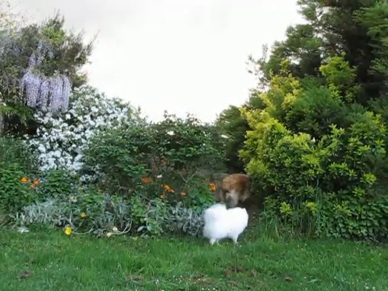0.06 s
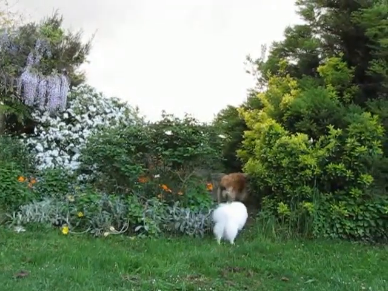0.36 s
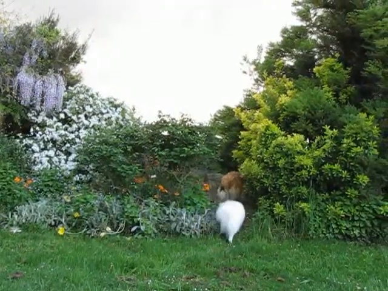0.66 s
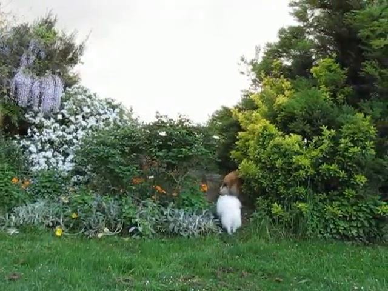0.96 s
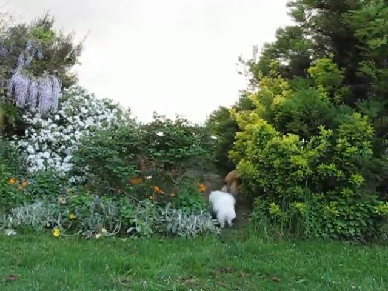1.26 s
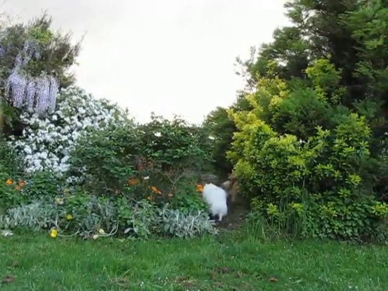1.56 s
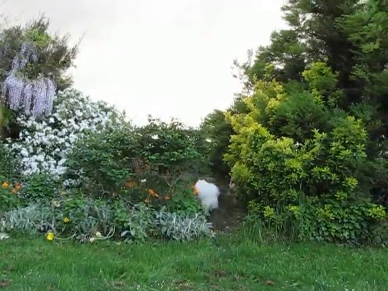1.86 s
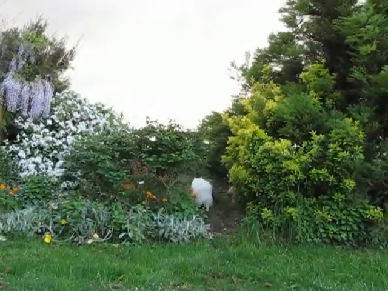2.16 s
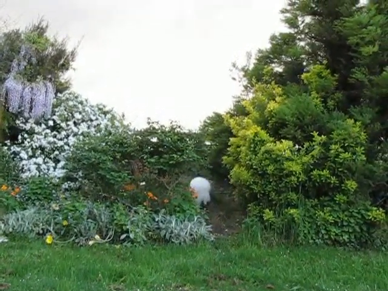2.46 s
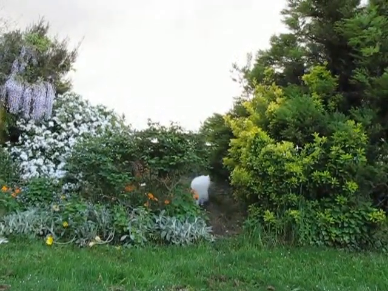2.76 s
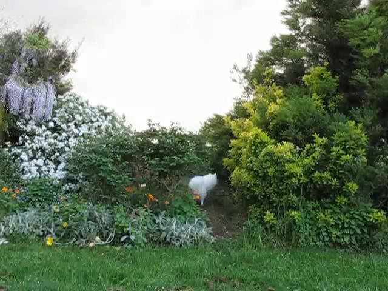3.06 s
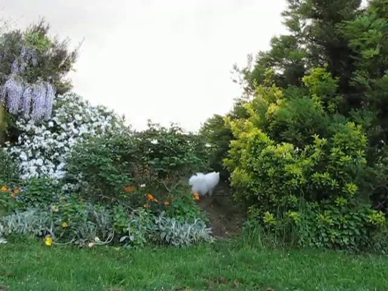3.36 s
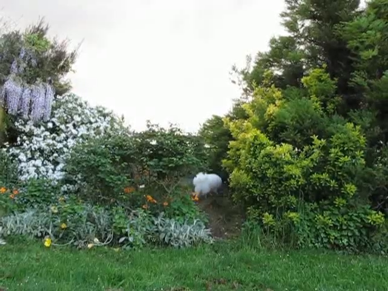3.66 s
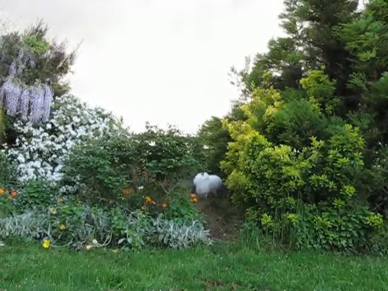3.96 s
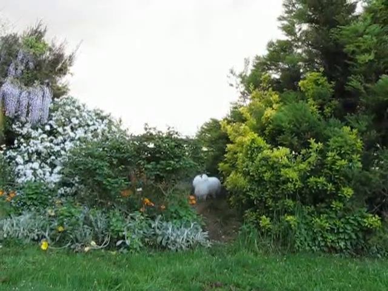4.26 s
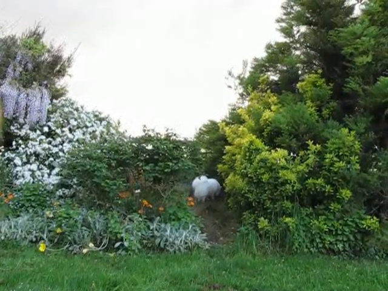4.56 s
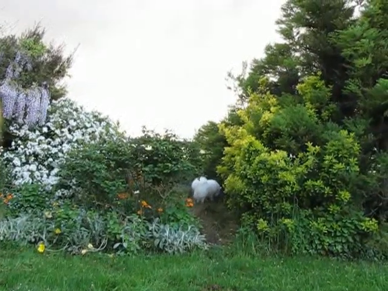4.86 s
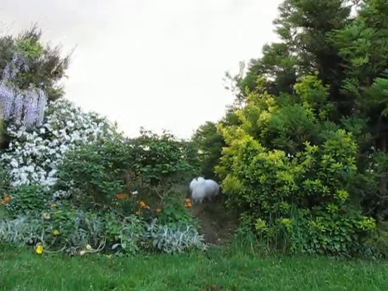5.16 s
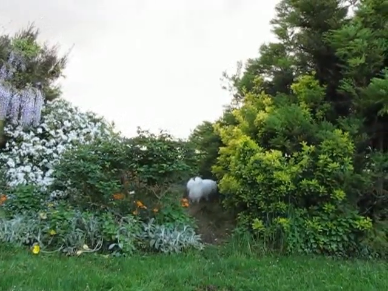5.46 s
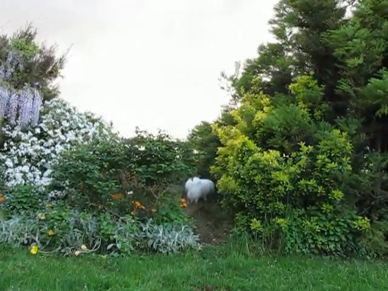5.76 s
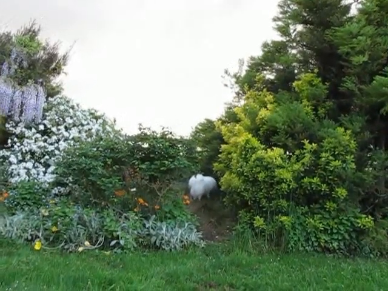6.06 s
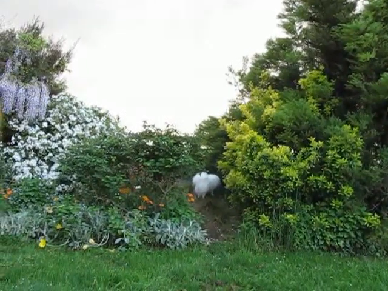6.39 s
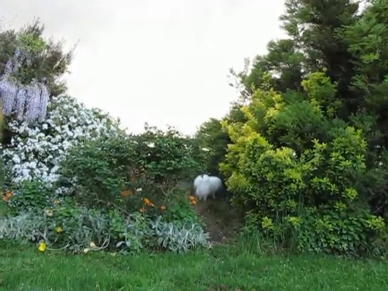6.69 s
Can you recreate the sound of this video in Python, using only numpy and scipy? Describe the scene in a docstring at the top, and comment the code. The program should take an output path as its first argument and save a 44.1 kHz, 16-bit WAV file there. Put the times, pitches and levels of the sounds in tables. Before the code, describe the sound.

A songbird whistles and trills in a garden over sparrow chirps, while gusts of wind rumble on the microphone.

```python
"""A hedged garden on a breezy day. Gusts buffet the two microphone ports, hardest at first, as a songbird
opens with whistles and slurs, then strings on trills, rising pairs and double chits. Past the middle the
wind eases, leaving sparrows farther off and soft chatter from the hedge. Near the end the songbird returns
with a run of hooks. Throughout, the shrubs scatter every note, and under it all lie distant traffic,
a motor's hum and a faint rustle of leaves."""
import sys
import numpy as np
from scipy import signal
from scipy.io import wavfile
from scipy.ndimage import uniform_filter1d

SR = 44100
rng = np.random.default_rng(int(sys.argv[2]) if len(sys.argv) > 2 else 0)


def put_to_file(sound):
    """Save the sound as 16-bit audio at rate SR, in the file named by the first command-line argument."""
    columns = np.atleast_2d(sound).T  # one column per channel
    safe = np.clip(columns, -1, 1)
    whole_steps = np.round(safe * 32767)
    wavfile.write(sys.argv[1], SR, whole_steps.astype(np.int16))


N = 301203

# Long whistles. Each row: start and length in seconds, held pitch, end pitch and closing lift in Hz,
# level in dB.
WHISTLE_NOTES = [(0.053, 0.185, 2901, 3036, -13, -34), (0.681, 0.17, 2827, 2835, 118, -31.5)]
# Falling slurs. Each row: start and length in seconds, onset and goal pitch in Hz, settling time in
# seconds, then level, scatter send and mid-note arch in dB.
SLUR_NOTES = [(0.289, 0.14, 4460, 3556, 0.037, -44.5, 3, 17.5),
              (0.891, 0.18, 4755, 3516, 0.051, -44.5, 1, 18),
              (1.754, 0.115, 3400, 1000, 0.066, -47.5, 1, 7),
              (2.53, 0.059, 3920, 2003, 0.032, -36, 2.5, 18.5),
              (2.704, 0.11, 4220, 2524, .028, -33.5, 0, 19.5), (6.282, 0.1, 2265, 2020, 0.034, -48, -3, 13),
              (6.328, 0.033, 2060, 1770, 0.013, -43, -2, 3)]
# Trills. Each row: start and length in seconds, centre pitch and swing either way in Hz, turns per second,
# level in dB.
TRILL_NOTES = [(1.29, 0.112, 3177, 780, 39, -43.5), (3.457, 0.11, 3076, 632, 39.5, -41.5)]
# Pairs of rising notes, the second lower and louder. Each row: start and first note's length in seconds,
# first and second pitch in Hz, level in dB.
PAIR_NOTES = [(1.514, 0.073, 3335, 2635, -40.5), (3.717, 0.072, 3230, 2599, -38)]
# Double chits. Each row: start and delay of the second chit in seconds, level in dB.
CHIT_NOTES = [(2.017, 0.045, -35.5), (2.148, 0.042, -34), (2.878, 0.05, -33.5), (3.017, 0.039, -33.5)]
# Hooked notes. Each row: start and length in seconds, top and end pitch in Hz, level in dB.
HOOK_NOTES = [(1.648, 0.019, 4800, 3840, -45), (5.468, 0.027, 4680, 3700, -52.5),
              (6.25, 0.019, 2280, 2280, -43), (6.439, 0.059, 2105, 1655, -44),
              (6.595, 0.057, 2280, 1764, -39), (6.765, 0.083, 3212, 2936, -33)]
# Thin, mostly faint glides. Each row: start and length in seconds, onset and end pitch in Hz, level in dB.
GLIDE_NOTES = [(0.31, 0.064, 6000, 6590, -56), (1.266, 0.032, 2800, 3590, -46.5),
               (1.395, 0.059, 1980, 2047, -55), (2.594, 0.062, 4450, 3940, -53.5),
               (2.595, 0.053, 2287, 2230, -51), (2.955, 0.022, 5270, 4860, -47),
               (3.93, 0.036, 5280, 4720, -48.5), (3.99, 0.086, 6100, 6460, -54.5),
               (6.344, 0.017, 2210, 2540, -50), (6.688, 0.12, 8130, 6420, -58.5)]
# The two-humped sparrow chirp. Each row: time into it in seconds, pitch in Hz, relative level in dB.
CHIRP_SHAPE = [(0, 3350, -12), (.009, 3950, -12), (.017, 4950, 3), (.029, 5330, -6), (.04, 4500, 3),
               (0.053, 3350, -5), (.062, 4620, -2.5), (.076, 4100, 2), (.091, 3650, 4.5), (.11, 2850, -3),
               (0.117, 2700, -18)]
# Sparrow calls. Each row: start in seconds, pitch ratio, level in dB, share in plain view from 0 to 1.
SPARROW_CALLS = [(0.53, 1.03, -43, 0.37), (1.852, 0.86, -46.5, 0), (2.989, 0.93, -50, 0.12),
                 (3.347, 0.99, -36, 0.73), (4.542, 0.9, -55, 0.78), (4.83, 1, -36, 0.71),
                 (5.64, 0.95, -50.5, 0), (6.68, 1, -51.5, 0.03)]
# A far bird's soft arches. Each row: start and length in seconds, top and end pitch in Hz, level in dB,
# share in plain view from 0 to 1.
CHATTER_NOTES = [(2.07, 0.086, 5800, 4360, -65, 0.13), (2.233, 0.13, 4510, 3920, -59, 0.2),
                 (3.62, 0.026, 4600, 4080, -49.5, 0.08), (3.902, 0.04, 5620, 5300, -58, 0.2),
                 (3.961, 0.1, 4020, 3400, -48, 0.02), (4.038, 0.079, 7380, 6500, -58, 0),
                 (4.074, 0.06, 5780, 5460, -54, 0.16), (4.168, 0.07, 4460, 4050, -51.5, 0.02),
                 (5.063, .045, 5820, 4650, -60, 0), (5.099, 0.035, 4800, 4200, -53, 0.15),
                 (5.12, 0.058, 4130, 3910, -53, .2), (5.198, 0.046, 5400, 4900, -61, 0),
                 (5.248, 0.07, 4430, 4130, -53, 0.22), (5.302, 0.051, 3700, 3000, -56, .15),
                 (5.387, 0.028, 3800, 3650, -58, 0.4), (5.559, 0.083, 4190, 4010, -52, .25),
                 (5.712, 0.031, 3780, 3260, -51.5, 0.3), (5.844, 0.041, 5780, 4530, -58, 0),
                 (5.893, 0.045, 4250, 3560, -54, 0.27), (6.19, 0.046, 4240, 4020, -56, 0.05),
                 (6.232, 0.025, 3240, 3100, -54, 0.25), (6.44, 0.064, 4390, 3930, -56, 0.08),
                 (6.499, 0.034, 3770, 2960, -49.5, .15)]
# Far, low calls. Each row: start and length in seconds, pitch in Hz, level in dB.
HOOT_NOTES = [(3.3, 0.17, 1096, -59), (3.57, 0.04, 1083, -59), (6.68, 0.025, 1085, -55)]
# Gusts on the ports. Each row: start and hold in seconds, level in dB, left over right in dB.
PORT_GUSTS = [(0.042, 0.05, -26.5, 8), (0.132, 0.059, -23, 0.5), (0.182, 0.045, -21.5, -8),
              (0.265, 0.053, -26.5, -3), (0.353, 0.027, -31, -10), (0.544, 0.022, -31.5, -2),
              (0.681, 0.074, -40.5, 9), (0.825, 0.033, -23.5, 13), (0.885, 0.023, -24.5, 1),
              (0.964, 0.043, -22.5, 7), (1.027, 0.071, -23.5, 2.5), (1.121, 0.029, -26, 20),
              (1.187, 0.067, -27, 1), (1.318, 0.12, -25.5, 21), (1.365, 0.013, -30, -4),
              (1.523, 0.042, -24.5, 7), (1.6, 0.29, -31.5, 6), (1.678, 0.045, -29.5, 12),
              (1.952, 0.032, -29, 2.5), (2.015, 0.056, -34, -5), (2.33, 0.6, -35, 10),
              (2.446, 0.017, -27, 21), (2.523, 0.11, -28, 11), (3.175, 0.26, -38, 6),
              (3.471, 0.035, -34, 17), (3.545, 0.035, -26.5, 6), (3.622, 0.14, -36.5, 1),
              (3.814, 0.026, -34, 8), (3.966, 0.17, -34, 2.5), (4.163, 0.099, -31.5, 6),
              (4.265, 0.026, -29.5, -2), (4.362, 0.02, -33, 1), (4.567, 0.034, -33, 17),
              (4.801, 0.05, -36, 4), (5.612, 0.055, -34, -6), (6.013, 0.027, -29, -4)]
# Round thumps in the gusts. Each row: time in seconds, centre in Hz, peak in dB, left over right in dB.
GUST_THUMPS = [(0.136, 41.7, -21, 18), (0.158, 71.4, -24, -19), (0.219, 53.7, -10, -12),
               (0.865, 80, -15, 12), (1.003, 70, -22, 8), (1.043, 85, -16, 21), (1.068, 58.4, -15, -15),
               (1.137, 81, -14.5, 20), (1.365, 95, -15, 14), (1.551, 70, -12, 12), (2.56, 70, -20.5, 13),
               (2.895, 55, -22, 9), (3.502, 38, -15, 18)]
# Tone of the wind rumble. Each row: frequency in Hz, relative noise density in dB.
BUFFET_SPECTRUM = [(11, -6), (18, -6.5), (43, 5), (86, -1), (140, -8.5), (203, -41.5), (290, -56),
                   (450, -49), (990, -120)]
# Tone of the traffic. Each row: frequency in Hz, relative noise density in dB.
TRAFFIC_SPECTRUM = [(30, -28), (60, -9), (100, -6), (150, -12.5), (220, -21.5), (330, -23), (480, -25.5),
                    (700, -26), (950, -19.5), (1300, -26), (2200, -42)]
# A mains motor and its fan, some way off. Each row: multiple of the line frequency, level in dB.
MOTOR_PARTIALS = [(1, -45.5), (1.45, -50.5), (2, -54), (3, -63), (5, -78.5)]
# Tone of the leaves. Each row: frequency in Hz, relative noise density in dB.
LEAF_SPECTRUM = [(1500, 13), (2200, 3), (4000, 9), (5200, -0.5), (6500, 2.5), (8700, -12.5), (10500, -11.5),
                 (13000, -39)]
# The leaves' steady stir. Each row: time in seconds, level in dB before the hiss gain.
LEAF_STIR = [(0.0, -74.5), (3.67, -73.5), (4.05, -75.5), (6.8, -77.5)]
# Brief rustles in the shrubs. Each row: time of the peak in seconds, swell in dB.
RUSTLE_SWELLS = [(.42, -0.5), (.77, 2), (.92, 1.5), (1.23, 3.5), (1.43, 4.5), (1.73, 3.5), (2.06, 6),
                 (2.32, 1), (3.3, 0.5), (3.72, 2.5)]
# Dry ticks in the shrubs. Each row: midpoint and length in seconds, band centre in Hz, level in dB.
SHRUB_TICKS = [(0.072, 0.004, 5100, -48.5), (0.199, 0.0032, 5000, -49.5), (0.77, 0.07, 8450, -60),
               (2.32, .03, 7200, -60)]
# Stereo width of diffuse sound. Each row: frequency in Hz, left-right correlation from -1 to 1.
AIR_CORRELATION = [(60, 1), (200, 0.74), (700, 0.69), (1300, 0.089), (2500, 0.0061), (12000, -0.18)]


def syrinx(t, hz, level_db, jitter, flutter_db=1.5, edge_s=0.0033, overtone_db=-40):
    """The voice of every bird: a nearly pure, slightly unsteady tone with soft edges."""
    phase = 2 * np.pi * np.cumsum(hz * (1 + jitter * waver(t, per_s=250))) / SR
    edges = np.sin(np.pi / 2 * np.clip(np.minimum(t, t[-1] - t) / edge_s, 0, 1)) ** 2
    gain = np.sqrt(2) * edges * from_db(level_db + flutter_db * waver(t, per_s=107))
    return gain * (np.sin(phase) + from_db(overtone_db) * np.sin(2 * phase))


def note(length, onset_hz, held_hz, end_hz, level_db, settle_s, swell_db, scatter_db,
         arch_db=4, blur=0.005):
    """A note slides onto a straight glide; its level tilts by swell_db and arches in the middle."""
    t = times(length)
    along = t / length
    hz = held_hz + (end_hz - held_hz) * along + (onset_hz - held_hz) * np.exp(-t / settle_s)
    effort_db = level_db + swell_db * (along - 0.5) + arch_db * (np.sin(np.pi * along) - 1)
    jitter = 0.0022 + blur * max(scatter_db, 0)  # notes from deep in the shrubs sound blurred
    return with_scatter(syrinx(t, hz, effort_db, jitter), scatter_db)


def whistles(onset_hz=3200, settle_s=0.0066, lift_s=0.028, attack_db=3, fade_db=6, fade_s=0.023):
    """Each whistle drops quickly onto its pitch, holds it, then bends smoothly as it fades."""
    out = np.zeros((2, N))
    for start, length, held_hz, end_hz, lift_hz, level_db in WHISTLE_NOTES:
        t = times(length)
        drop_hz = (onset_hz - held_hz) * np.exp(-t / settle_s)
        lift = np.sin(np.pi / 2 * np.clip(1 - (length - t) / lift_s, 0, 1)) ** 2
        hz = np.interp(t, [0, length], [held_hz, end_hz]) + drop_hz + lift_hz * lift
        effort_db = level_db - attack_db * np.exp(-t / fade_s) - fade_db * np.exp((t - length) / fade_s)
        tone = syrinx(t, hz, effort_db, jitter=0.0014, flutter_db=0.1)
        add(out, start, with_scatter(tone, scatter_db=-3))
    return out


def slurs(flutter_db=5.5):
    """The pitch falls fast at first, then levels out towards its goal; the level flutters."""
    out = np.zeros((2, N))
    for start, length, onset_hz, goal_hz, settle_s, level_db, scatter_db, arch_db in SLUR_NOTES:
        slur = note(length, onset_hz, goal_hz, goal_hz, level_db, settle_s,
                    swell_db=-20.5, scatter_db=scatter_db, arch_db=arch_db)
        add(out, start, slur * from_db(flutter_db * waver(times(length), per_s=66.3)))
    return out


def trills(rise_share=0.72, first_top_s=0.00505):
    """The pitch climbs slowly and drops fast, over and over."""
    out = np.zeros((2, N))
    for start, length, centre_hz, swing_hz, turns_per_s, level_db in TRILL_NOTES:
        t = times(length)
        swing = -signal.sawtooth(2 * np.pi * turns_per_s * (t - first_top_s), 1 - rise_share)
        tone = syrinx(t, centre_hz + swing_hz * swing, level_db, jitter=0.015)
        add(out, start, with_scatter(tone, scatter_db=2))
    return out


def rising_pairs(link_s=0.032, second_s=0.08):
    """A scooped note with a softer voice an octave below, which slides up into a second, swelling note."""
    out = np.zeros((2, N))
    for start, length, first_hz, second_hz, level_db in PAIR_NOTES:
        first = first_hz * np.array([0.82, 1, 1.075])  # onset, held and end pitch
        second = second_hz * np.array([0.9, 1, 1.06])
        low_hz = first[-1] / 2
        upper = note(length, *first, level_db, settle_s=0.012, swell_db=2, scatter_db=0.5, arch_db=3)
        lower = note(length, *(first / 2), level_db - 18, settle_s=0.0152, swell_db=-4, scatter_db=-3)
        link = note(link_s, low_hz, low_hz, second[0], level_db - 15,
                    settle_s=link_s, swell_db=12, scatter_db=5)
        answer = note(second_s, *second, level_db + 4, settle_s=0.0183, swell_db=6.5, scatter_db=1)
        add(out, start, upper + lower)
        add(out, start + length, link)
        add(out, start + length + link_s, answer)
    return out


def chits(length_s=0.0232, onset_hz=3720, knee_hz=3200, end_hz=2370, second_db=-4):
    """The same steep downward flick twice, the second softer."""
    out = np.zeros((2, N))
    for start, delay, level_db in CHIT_NOTES:
        for when, db in ((start, level_db), (start + delay, level_db + second_db)):
            flick = note(length_s, onset_hz, knee_hz, end_hz, db, settle_s=0.0106, swell_db=5, scatter_db=0)
            add(out, when, flick)
    return out


def arch(length, top_hz, end_hz, leap_s, leap_from=0.7):
    """Times and pitch of a note that leaps up to its top, then glides evenly to its end."""
    t = times(length)
    leap = leap_from + (1 - leap_from) * np.sin(np.pi / 2 * np.minimum(t / leap_s, 1))
    return t, leap * np.interp(t, [leap_s, length], [top_hz, end_hz])


def hooks(arch_db=6):
    """Each hook leaps up from well below and is fullest in the middle; most sink again."""
    out = np.zeros((2, N))
    for start, length, top_hz, end_hz, level_db in HOOK_NOTES:
        t, hz = arch(length, top_hz, end_hz, leap_s=0.0177)
        effort_db = level_db + arch_db * (np.sin(np.pi * t / length) - 1)
        add(out, start, with_scatter(syrinx(t, hz, effort_db, jitter=0.012)))
    return out


def thin_glides():
    """Plain glides with a strong send into the shrubs."""
    out = np.zeros((2, N))
    for start, length, onset_hz, end_hz, level_db in GLIDE_NOTES:
        add(out, start, note(length, onset_hz, onset_hz, end_hz, level_db,
                             settle_s=length, swell_db=4, scatter_db=3, blur=0.0047))
    return out


def with_scatter(sound, scatter_db=0):
    """Two rows: what comes straight, and the send into the shrubs."""
    return np.array([sound, sound * from_db(scatter_db)])


def garden(direct, sent, build_s=0.012, early_t60_s=0.14, late_t60_s=0.5, late_db=-6,
           wet_db=-2.5, echo_s=0.046, echo_db=-19.5, left_lead_s=0.00008):
    """Dense early scatter from near shrubs, a weaker long tail, one echo off the hedge; birds sit left."""
    t = times(1)
    decay = from_db(-60 * t / early_t60_s) + from_db(late_db - 60 * t / late_t60_s)
    reflections = rng.standard_normal((2, SR)) * decay * (1 - np.exp(-t / build_s))
    response = from_db(wet_db) * rms_one(reflections) / np.sqrt(SR)
    response[:, int(echo_s * SR)] += from_db(echo_db)
    scattered = signal.fftconvolve(sent[None], response, axes=1)[:, :N]
    now = np.arange(N) / SR
    straight = np.array([direct, np.interp(now - left_lead_s, now, direct)])
    return (straight + scattered) * pan(left_over_right_db=2.2)


def chirp(ratio, level_db, jitter):
    """One raspy sparrow chirp, sung higher or lower."""
    shape_s, shape_hz, shape_db = np.transpose(CHIRP_SHAPE)
    t = times(shape_s[-1])
    hz = ratio * np.interp(t, shape_s, shape_hz)
    return syrinx(t, hz, level_db + np.interp(t, shape_s, shape_db), jitter)


def sparrows(open_jitter=0.0213, hidden_jitter=0.068):
    """A bird in the open is heard straight; one behind the hedge only through the leaves, and blurred."""
    near, hidden = np.zeros((2, 2, N))
    for start, ratio, level_db, in_view in SPARROW_CALLS:
        call = chirp(ratio, level_db, in_view * open_jitter + (1 - in_view) * hidden_jitter)
        add(near, start, with_scatter(in_view * call))
        add(hidden, start, through_hedge((1 - in_view) * call))
    return near, hidden


def hedge_chatter(rasp=0.0733, jitter=0.038):
    """Soft arched notes; the more hidden a note, the more its fast, uneven warble blurs it."""
    out = np.zeros((2, N))
    for start, length, top_hz, end_hz, level_db, in_view in CHATTER_NOTES:
        t, hz = arch(length, top_hz, end_hz, leap_s=0.022)
        blur = (1 - in_view) ** 2
        warble = 1 + blur * rasp * waver(t, per_s=600)
        call = syrinx(t, hz * warble, level_db, blur * jitter, flutter_db=2, edge_s=0.0031)
        add(out, start, through_hedge(call, in_view))
    return out


def far_flock(count=70, level_db=-73.5, spread_db=2, low_ratio=0.96, high_ratio=1.8):
    """Many more sparrows chatter at random in the distance."""
    out = np.zeros((2, N))
    for k, (when, pitch, strength) in enumerate(rng.random((count, 3))):
        ratio = low_ratio + (high_ratio - low_ratio) * pitch
        call = chirp(ratio, level_db + spread_db * (2 * strength - 1), jitter=0.0553)
        add(out, (k + when) / count * N / SR, through_hedge(call))
    return out


def far_hoots():
    """Faint, hoarse hoots that distance blurs into the traffic."""
    out = np.zeros((2, N))
    for start, length, hz, level_db in HOOT_NOTES:
        add(out, start, through_hedge(syrinx(times(length), hz, level_db, jitter=0.035, flutter_db=0)))
    return out


def through_hedge(call, in_view=0, t60_s=0.34):
    """Many paths through the leaves smear a call into a soft wash; the share in view comes straight."""
    t = times(1 / 3)
    wash = rms_one(rng.standard_normal((2, len(t))) * from_db(-60 * t / t60_s))
    paths = wash * np.sqrt((1 - in_view) / len(t))
    paths[:, 0] += np.sqrt(in_view)
    return signal.fftconvolve(call[None], paths, axes=1) * pan(left_over_right_db=4)


def gusts(attack_s=0.012, release_s=0.031, lull_db=-43, flutter_db=0.76):
    """Wind strength at each port: fluttering gusts rise, hold and die away over a light breeze."""
    t = np.arange(N) / SR
    power = np.full((2, N), from_db(lull_db) ** 2)
    for start, hold, level_db, pan_db in PORT_GUSTS:
        shape = np.exp(np.minimum(t - start, 0) / attack_s - np.maximum(t - start - hold, 0) / release_s)
        power += (from_db(level_db) * rms_one(pan(pan_db)) * (shape + 1e-9)) ** 2
    flutter = np.array([waver(t, per_s=20), waver(t, per_s=20)])
    return np.sqrt(power) * from_db(-flutter_db * flutter)


def wind(left_strong_db=-26, right_strong_db=-21, brightening=0.49, pivot_hz=70, shared=0.11, eddy_s=0.072):
    """Eddies rumble at each port; stronger gusts shed smaller, brighter ones, sooner on the exposed left."""
    strength = gusts()
    excess_db = 20 * np.log10(strength) - np.array([[left_strong_db], [right_strong_db]])
    eddies = sum(band * from_db(brightening * excess_db * np.log2(hz / pivot_hz))
                 for hz, band in noise_bands(BUFFET_SPECTRUM))
    eddies = eddies + shared * eddies[::-1]
    # even out the eddies, so the gust alone sets their strength
    running_rms = np.sqrt(uniform_filter1d(eddies ** 2, int(eddy_s * SR), axis=1) + 1e-12)
    return eddies / running_rms * strength


def thumps():
    """A single large eddy crosses a port: one round dip of pressure between two soft shoulders."""
    out = np.zeros((2, N))
    t = np.arange(-SR // 25, SR // 25) / SR
    for when, hz, peak_db, pan_db in GUST_THUMPS:
        u = (np.pi * hz * t) ** 2
        ports = from_db(peak_db + np.minimum([[pan_db], [-pan_db]], 0))
        add(out, when + t[0], ports * (2 * u - 1) * np.exp(-u))
    return out


def traffic(level_db=-47.5):
    """Distant traffic merges into a steady, low murmur."""
    return from_db(level_db) * air(TRAFFIC_SPECTRUM)


def motor_hum(line_hz=62.25, wander=0.0056, waver_db=2):
    """The steady tones of a motor and its fan, wavering a little on the wind."""
    t = np.arange(N) / SR
    phase = 2 * np.pi * np.cumsum(line_hz * (1 + wander * waver(t, per_s=6.2))) / SR
    return sum(np.sqrt(2) * from_db(level_db + waver_db * waver(t, per_s=15)) * np.sin(multiple * phase)
               for multiple, level_db in MOTOR_PARTIALS)


def rustle_db(swell_s=0.096):
    """How much the leaves move: a steady stir with brief swells, driving both hiss and crackle."""
    t = np.arange(N) / SR
    steady_db = np.interp(t, *np.transpose(LEAF_STIR))
    return steady_db + sum(db * np.exp(-((t - when) / swell_s) ** 2) for when, db in RUSTLE_SWELLS)


def leaf_hiss(gain_db=19.5, flutter_db=2.5, grain_db=1.5):
    """A fine, grainy hiss that flutters with the breeze, leaning to the shrubs on the right."""
    t = np.arange(N) / SR
    texture_db = flutter_db * waver(t, per_s=18) + grain_db * waver(t, per_s=300)
    return from_db(rustle_db() + gain_db + texture_db) * air(LEAF_SPECTRUM) * pan(left_over_right_db=-1.2)


def crackle(busy_per_s=120, busy_db=-75, size_db=-48, spread_db=2):
    """Leaves and stalks snap against each other, more often as the rustle grows."""
    snaps = rng.random(N) < busy_per_s * from_db(2 * (rustle_db() - busy_db)) / SR
    sizes = from_db(size_db + spread_db * np.minimum(rng.exponential(1, N), 3)) * rng.standard_normal((2, N))
    return band_pass(snaps * sizes + 1e-18, low_hz=4500, high_hz=10500)


def ticks(band_ratio=1.1):
    """Very short dry bursts in a narrow treble band, close by."""
    out = np.zeros(N)
    for when, length, hz, level_db in SHRUB_TICKS:
        size = int(length * SR)
        burst = rms_one(band_pass(rng.standard_normal(SR // 10), hz / band_ratio, hz * band_ratio))[-size:]
        add(out, when - length / 2, from_db(level_db) * burst * np.hanning(size))
    return out


def air(spectrum):
    """Diffuse far sound: alike in both ears in the bass, wide in the treble."""
    out = 0
    for hz, (mid, side) in noise_bands(spectrum):
        alike = at_hz(AIR_CORRELATION, hz)
        out = out + np.sqrt(1 + alike) * mid + np.sqrt(1 - alike) * np.array([side, -side])
    return rms_one(out)


def noise_bands(spectrum):
    """Yield the centre in Hz and two unrelated noises for each half octave of a spectrum."""
    white = rng.standard_normal((2, 2, N + SR // 2))
    edges = 2 ** np.arange(np.log2(spectrum[0][0]), np.log2(spectrum[-1][0]), 0.5)
    for k, low in enumerate(edges):
        hz = low * 2 ** 0.25
        yield hz, from_db(at_hz(spectrum, hz)) * band_pass(white[k % 2], low, low * np.sqrt(2))[:, -N:]


def band_pass(x, low_hz, high_hz):
    """Second-order Butterworth band."""
    return signal.sosfilt(signal.butter(2, [low_hz, high_hz], "band", fs=SR, output="sos"), x)


def at_hz(points, hz):
    """Read a curve on a log-frequency axis."""
    knots_hz, values = np.transpose(points)
    return np.interp(np.log(hz), np.log(knots_hz), values)


def waver(t, per_s):
    """A random wobble of about unit size, heading for a new value per_s times a second."""
    knots = rng.standard_normal(4096)
    return np.interp(t * per_s, np.arange(len(knots)), knots)


def times(length):
    """Sample times in seconds."""
    return np.arange(int(length * SR)) / SR


def from_db(db):
    """Decibels to gain."""
    return 10 ** (np.asarray(db) / 20)


def pan(left_over_right_db):
    """Left and right gains, split evenly about 0 dB."""
    return from_db(np.array([[0.5], [-0.5]]) * left_over_right_db)


def rms_one(x):
    """Scale to unit power."""
    return x / np.sqrt(np.mean(x ** 2) + 1e-20)


def add(track, start, sound):
    """Mix a sound into a track at a time in seconds."""
    i = max(int(start * SR), 0)
    track[..., i:i + sound.shape[-1]] += sound[..., :max(N - i, 0)]


def scene():
    """Birds in the garden and behind the hedge, far traffic and a motor, leaves and wind."""
    near, hidden = sparrows()
    song = whistles() + slurs() + trills() + rising_pairs() + chits() + hooks() + thin_glides()
    direct, sent = song + near
    birds = garden(direct, sent) + hidden + hedge_chatter() + far_flock() + far_hoots()
    town = traffic() + motor_hum()
    shrubs = leaf_hiss() + crackle() + ticks()
    return birds + town + shrubs + wind() + thumps()


def record(dry):
    """A steep low-pass takes off the very top."""
    stop_db, stop_hz = 70, 14100
    return signal.sosfilt(signal.cheby2(12, stop_db, stop_hz, fs=SR, output="sos"), dry)


dry = scene()
out = record(dry)
put_to_file(out)
```